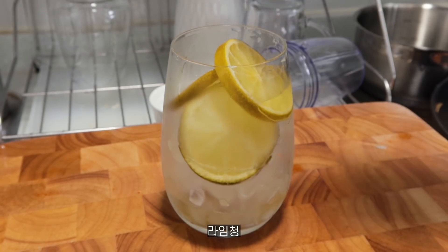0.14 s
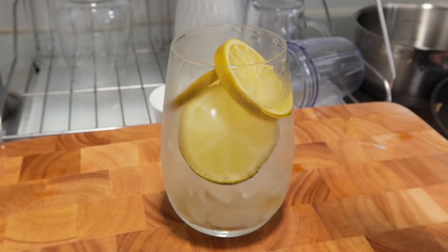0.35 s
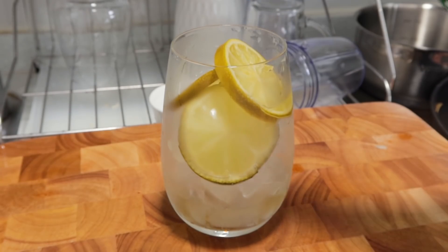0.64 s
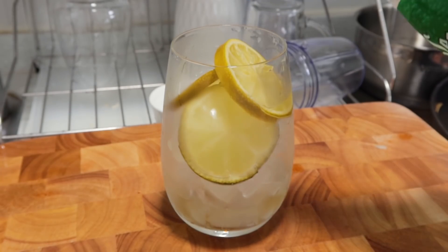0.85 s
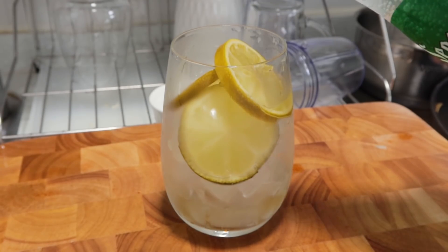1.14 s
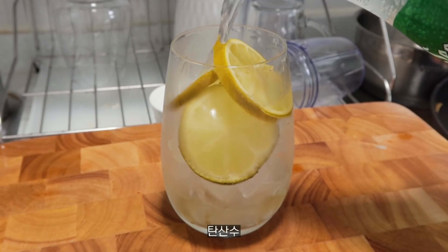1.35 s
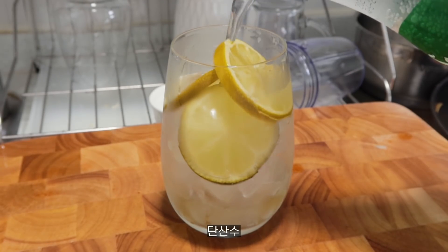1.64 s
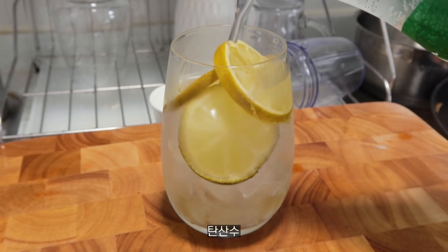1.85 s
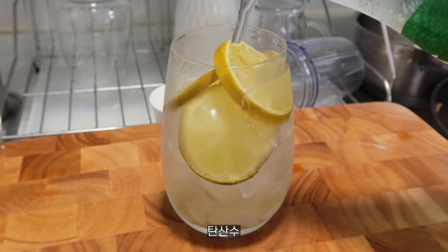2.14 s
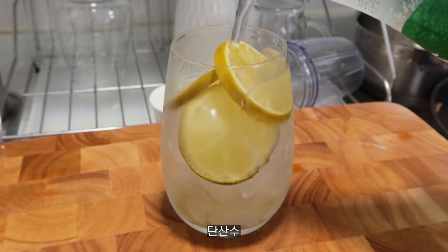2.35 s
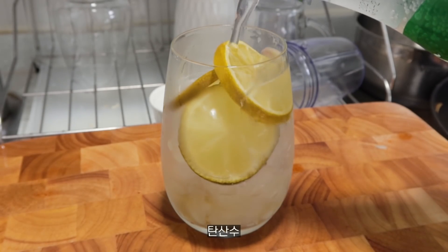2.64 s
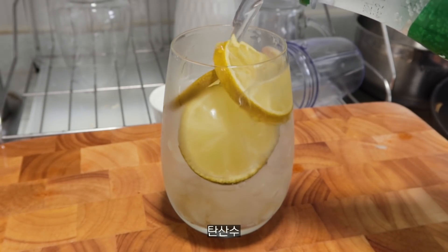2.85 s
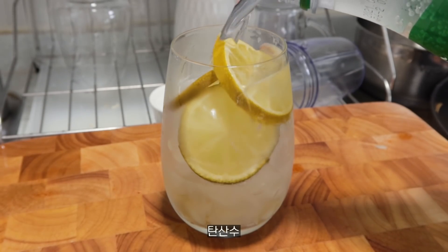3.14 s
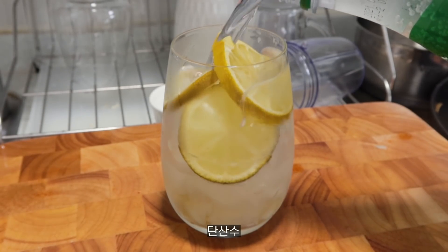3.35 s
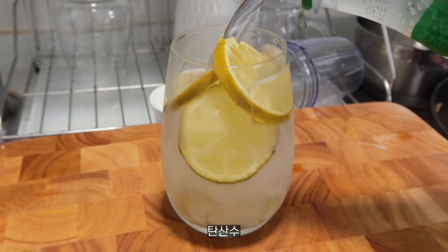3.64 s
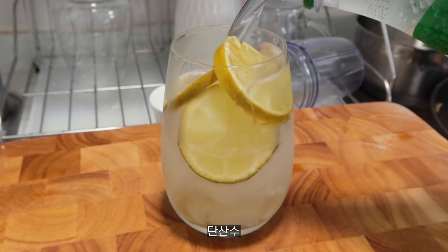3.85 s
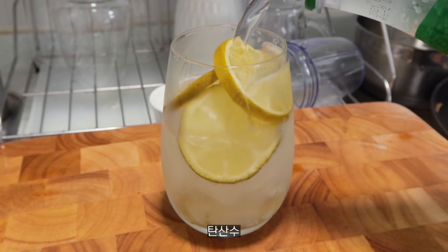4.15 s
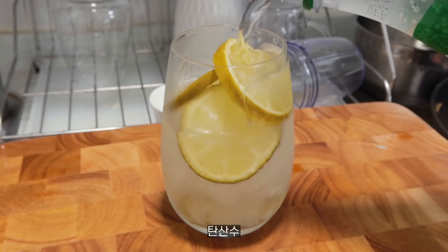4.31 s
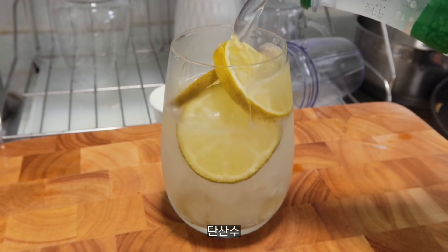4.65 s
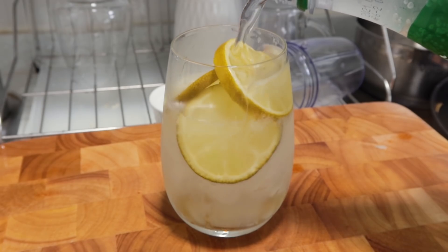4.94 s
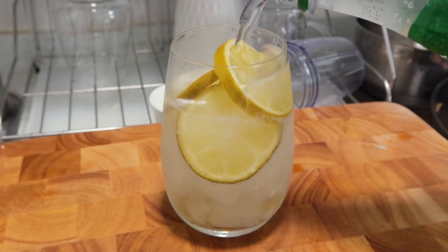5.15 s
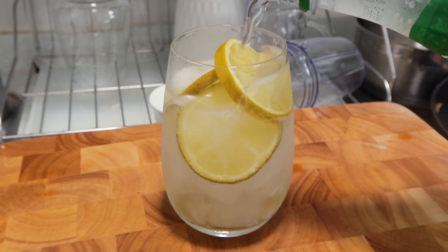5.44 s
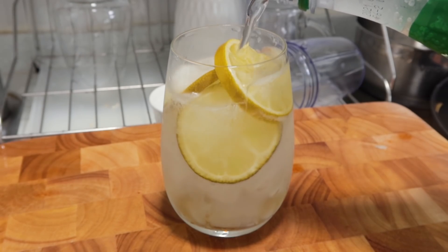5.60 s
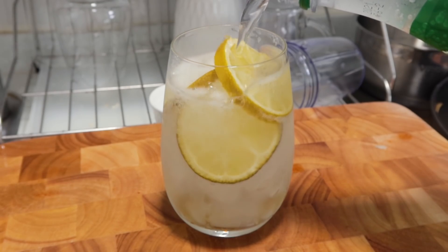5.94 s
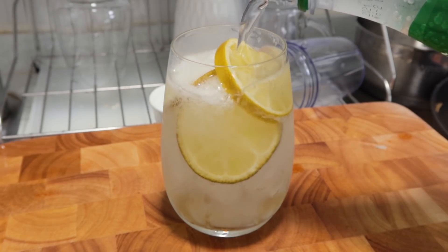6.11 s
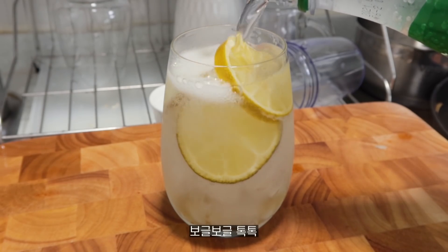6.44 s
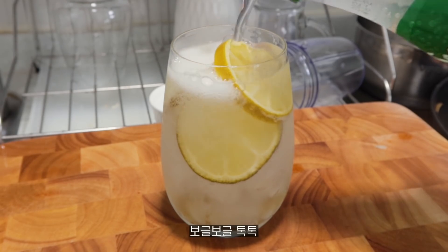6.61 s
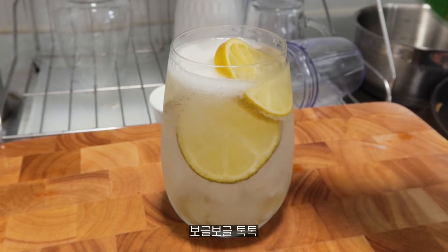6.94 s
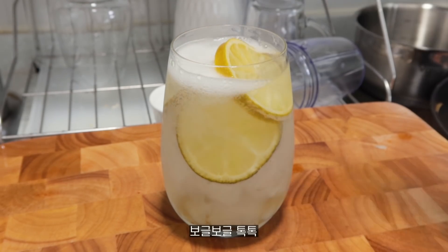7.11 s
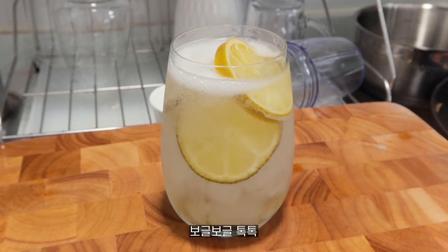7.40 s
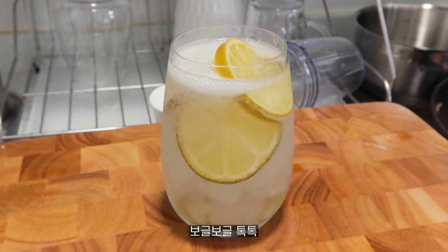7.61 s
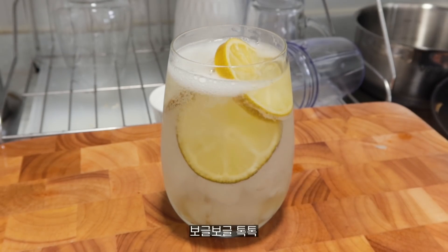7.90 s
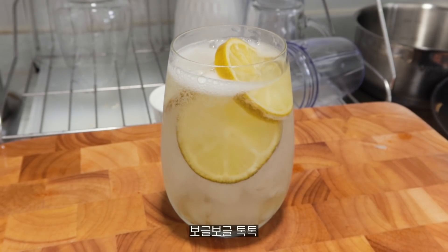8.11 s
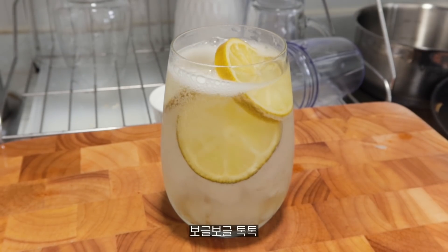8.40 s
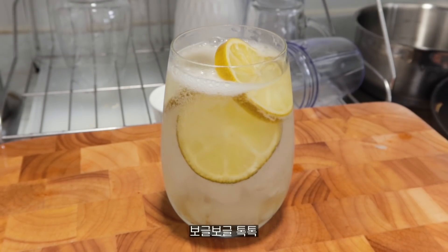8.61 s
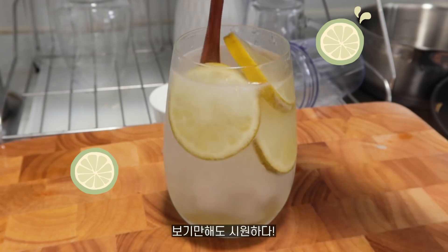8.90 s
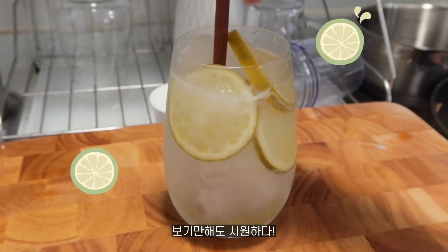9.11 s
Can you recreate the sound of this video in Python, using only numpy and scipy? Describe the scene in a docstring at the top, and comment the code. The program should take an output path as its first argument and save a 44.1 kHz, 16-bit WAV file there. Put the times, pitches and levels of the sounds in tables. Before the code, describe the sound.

In a quiet, faintly humming kitchen, close to a tall glass, ice ticks and small bubbles ping as soda is poured. Fine fizz grows into a broad, bright hiss while the glass's hollow note mostly climbs. After a long steady fizz, it cuts off suddenly; a loud rising plop and quick wet slaps and splashes end it.

```python
"""Soda fizzes over ice and lemon in a tall glass, close up in a humming kitchen.
The fizz is a swarm of tiny ringing bubbles and hiss, coloured by the air in the glass; foam broadens it.
The note of the air column mostly climbs as the glass fills; ice ticks and single bubbles pop.
At the end a heavy drop plops, a gliding tone, and noise bursts and bubbles make the slosh and splashes."""
import sys
import numpy as np
from scipy import signal
from scipy.fft import rfft, irfft, next_fast_len
from scipy.io import wavfile
from scipy.ndimage import uniform_filter1d, map_coordinates

SR = 44100
rng = np.random.default_rng(int(sys.argv[2]) if len(sys.argv) > 2 else 0)


def file_out(sig):
    """Save sig as 16-bit WAV at sys.argv[1]."""
    # one column per channel
    cols = np.atleast_2d(sig).T
    # limit, then scale
    lim = np.clip(cols, -1, 1)
    pcm = np.round(lim * 32767).astype(np.int16)
    wavfile.write(sys.argv[1], SR, pcm)


N = 408366  # length of the scene [samples]

# In every table, levels are relative to the other parts of the same sound unless a comment says more.
# T60 is the time a sound takes to fade by 60 dB.

# room noise: (frequency [Hz], level per Hz [dB])
KITCHEN_COLOUR = [(12, -46), (20, -21), (44, -6.5), (167, -8), (214, -10), (246, -5), (344, -12.5),
                  (418, -11), (1140, -17), (1280, -17.5), (2630, -23), (3030, -20.5), (4480, -23),
                  (8500, -23.5), (15700, -25)]
# hum of appliances: (pitch [Hz], average level [dB])
HUM_TONES = [(52, -67.5), (102, -69), (242, -66), (9400, -81)]
# echoes from the board and walls: (delay [s], level [dB])
WALL_ECHOES = [(0.00252, -17.5), (0.00481, -17), (0.00526, -26), (0.00534, -18), (0.00543, -19),
               (0.00589, -21.5), (0.00641, -22), (0.00716, -21.5)]
# faint hollow notes before the pour: (middle [s], half length [s], pitch [Hz], level [dB])
HOLLOW_NOTES = [(.62, .17, 1085, -67), (0.658, .14, 2610, -70), (1.0, 0.31, 1960, -70)]
# tone of the ice ticks: (frequency [Hz], level per Hz [dB])
CRACKLE_COLOUR = [(900, -40), (2000, -6), (3300, -8), (4600, 2), (8700, 0), (15000, -6)]
# ice cracking and spatter: (time [s], level [dB], centre [Hz], T60 [s])
ICE_SNAPS = [(0.349, -56, 7000, 0.26), (0.599, -48, 4500, .04), (.888, -49, 6500, .027),
             (1.187, -43, 7800, .026), (1.347, -44, 9000, .023), (1.425, -48, 8500, 0.033),
             (1.493, -43.5, 13000, .04), (1.526, -48, 4500, .03), (1.553, -47, 6000, .025),
             (1.615, -47, 10000, .04), (1.701, -39, 12400, 0.056), (2.029, -47, 1720, 0.052),
             (2.452, -38, 2400, .018), (2.609, -31, 6870, 0.016), (3.23, -47, 14500, .06),
             (4.28, -36, 2000, 0.028)]
# pings of single bubbles: (time [s], level [dB], pitch [Hz])
BUBBLE_POPS = [(.632, -44, 5010), (.659, -39.5, 5720), (.706, -45, 8500), (.94, -46.5, 7700),
               (1.111, -44, 8500), (1.495, -35.5, 4370), (1.527, -43, 3920), (1.553, -42, 2530),
               (1.581, -44, 6600), (1.59, -27.5, 4230), (1.624, -40, 5300), (1.696, -37.5, 6370),
               (1.757, -41.5, 2590), (1.78, -42, 5700), (1.862, -43.5, 707), (2.029, -40, 1870),
               (2.078, -28.5, 2150), (2.111, -42, 4300), (2.134, -44, 4440), (2.258, -46.5, 2140),
               (2.305, -41, 4440), (2.354, -32.5, 722), (2.448, -38, 2850), (2.766, -31.5, 7000),
               (3.026, -31.5, 8100), (3.278, -36, 2170), (3.319, -42, 806), (3.349, -21, 6860),
               (3.507, -34, 4140), (3.81, -42, 950), (3.903, -34, 3940), (4.12, -35, 2270),
               (4.16, -36, 900), (4.2, -41, 1180)]
# the drop meets the surface: (pitch [Hz], level [dB], T60 [s])
IMPACT_TONES = [(556, -14, 0.033), (960, -7, 0.023), (2740, -5, 0.014), (3450, -5, 0.013),
                (5680, -1, 0.026), (7000, -7, 0.023), (8460, -8, .03)]
# resonances rung by the plop: (pitch [Hz], T60 [s], level [dB])
BASIN_TONES = [(940, 0.089, -23.5), (1430, 0.052, -29), (1770, 0.1, -24), (2430, 0.061, -20.5)]
# tone of moving liquid: (frequency [Hz], level per Hz [dB])
WATER_COLOUR = [(88, -54), (150, -35), (312, -17), (384, -8), (419, -10.5), (579, -3.5), (732, -12),
                (898, -6.5), (1550, -7.5), (1760, -10), (2860, -13.5), (5000, -22), (6500, -55),
                (11000, -120)]
# tone of flying spray: (frequency [Hz], level per Hz [dB])
SPRAY_COLOUR = [(1650, -6), (2800, -7.5), (4710, 0.5), (5640, 2.5), (6900, -1), (8880, 3), (15700, -8.5)]
# waves of sloshing liquid: (time [s], body level [dB], spray level [dB], T60 [s])
SLOSH_WAVES = [(8.731, -33, -57, 0.094), (8.794, -24, -28, 0.2), (8.83, -41, -38.5, 9),
               (8.992, -24, -35.5, 1.77), (9.042, -21, -23, 0.2)]
# slaps of liquid: (time [s], level [dB], bubble pitch [Hz], spray against the slap before a 4 dB cut [dB])
LIQUID_SLAPS = [(8.993, -15.5, 1400, -12), (9.007, -14, 890, -18), (9.043, -7.5, 2830, -6.5),
                (9.056, -23, 1040, -7), (9.069, -16, 520, -18), (9.075, -13, 1190, -19),
                (9.086, -14.5, 900, 0.5), (9.121, -8.5, 575, -17), (9.138, -15, 580, -13),
                (9.222, -11.5, 990, -13), (9.244, -8.5, 1600, -16), (9.247, -14, 574, -20)]
# cross modes of the air above the drink: (frequency before the climb [Hz], width [Hz], level [dB])
AIR_MODES = [(1795, 220, -2.5), (2310, 210, -5.5), (2670, 160, -3), (3780, 160, -0.5), (4240, 250, 3),
             (4900, 460, 1), (5930, 580, 0), (6520, 370, -3), (7700, 1300, -3), (8730, 430, 2.5),
             (10400, 1200, -9), (12970, 1400, -5.5), (14900, 1500, -12)]
# the same air, damped by foam: (frequency [Hz], level per Hz [dB])
FOAM_COLOUR = [(500, -20.5), (950, -12.5), (1350, -11), (1700, -1.5), (2290, 9.5), (3250, -2), (4350, 3.5),
               (5350, -2.5), (6250, 2), (7450, -5), (8750, 1.5), (9700, -9.5), (11800, -12), (13100, -8.5),
               (15700, -15)]
# how hard the drink gives off gas, which sets the fine fizz: (time [s], level [dB])
GAS_LEVEL = [(.3, -80), (.65, -68), (1.55, -65.5), (2.15, -65.5), (2.65, -55.5), (3.35, -47.5),
             (3.8, -49.3), (4.15, -43.5), (5.3, -41), (6.3, -42), (7.5, -40.5), (8.7, -41)]
# the air column shortens as the glass fills: (time [s], pitch [Hz])
COLUMN_PITCH = [(2.3, 700), (3.3, 821), (3.9, 983), (4.2, 1189), (5.0, 1672), (5.8, 1900), (7.5, 1738),
                (8.7, 1883)]
# the tone of the fizz drifts as the foam builds and settles, each column a change in level:
# (middle [s], half length [s], medium bubbles [dB], coarse bubbles [dB], air column [dB])
FIZZ_DRIFTS = [(3.05, .3, -2, -1, 2), (4.3, .2, 1, 1.5, 3), (4.9, .3, -2.5, .5, 4),
               (6.056, 0.36, 2, 1.3, -10.5), (7.15, .5, -2, -4.5, 7.5), (7.95, .25, -1, 1.5, 0),
               (8.554, .33, 3.7, -5.3, -3)]
# the stream surges and rings the glass: (middle [s], half length [s], pitch at the middle [Hz], level [dB])
STREAM_SURGES = [(2.62, .18, 4450, -56.5), (3.61, .16, 4300, -49.5), (4.65, .35, 4520, -49.5),
                 (6.3, .6, 2330, -48)]

TOP_HZ = 15780  # nothing is kept above this
DRONE_S, DRONE_HALF_S, DRONE_DB, DRONE_SWELL_DB = 4.2, 0.81, -69, 7  # middle, half length, level, swell

CRACKLE_FROM_S, CRACKLE_PEAK_S, CRACKLE_TO_S = .45, 1.3, 3.6  # the ice crazes as it is wetted
CRACKLE_DB, CRACKLE_SPREAD_DB, CRACKLE_T60_S = -54, 2.5, .025  # level before colouring
POP_T60_S, POP_REF_HZ, POP_DAMPING = 0.019, 4000, .4  # T60 at that pitch; higher pops die sooner by this power
TRICKLE_DB, TRICKLE_GROWS = -43, 0.53  # gain at full gas; dB of change for each dB of gas

# the drop's trapped bubble
PLOP_S, PLOP_HZ, PLOP_DB = 8.8147, 432, -9.3  # time, starting pitch, level
PLOP_OCTAVES_PER_S = 12.2  # it rises towards the surface
PLOP_ATTACK_S, PLOP_HOLD_S, PLOP_T60_S = 0.0015, 0.023, 0.093
TICK_S = 8.7962  # the drop touches the surface
WAVE_ATTACK_S = 0.0065

FIZZ_END_S, FIZZ_FADE_DB_PER_S = 8.76, 250
FOAM_HALF_S, FOAM_SPREAD_S = 4.92, 0.56  # the head of foam is half closed; how gradually it closes
MEDIUM_BARE_DB, MEDIUM_FOAM_DB = -8.5, -2  # medium bubbles against fine ones, on bare drink and under foam
COARSE_BARE_DB, COARSE_FOAM_DB = -9, -.5  # the same for coarse bubbles
COLUMN_DB, COLUMN_UNDER_FOAM_DB = -8, -1  # air column against coarse bubbles; change under full foam
SPUTTER_DB = .7  # extra unevenness of the fizz on bare drink
SING_WANDER_HZ, SING_FLICKER_DB = 70, 2.4
SING_FOLLOWS = .4  # share of the air column's climb that the ringing glass follows


def amp(db):
    """Turn decibels into gain."""
    return 10 ** (np.asarray(db) / 20)


def unit(x):
    """Scale to an average (rms) level of 1."""
    return x / np.sqrt(np.mean(x ** 2) + 1e-20)


def curves(rows):
    """Join table points into one value per sample for each column after the time."""
    s, *cols = np.transpose(rows)
    return [np.interp(np.arange(N) / SR, s, c) for c in cols]


def wobble(rate):
    """A smooth random curve with about this many random points a second."""
    knots = rng.standard_normal(int(N * rate / SR) + 4)
    coarse = np.arange(0, N + 64, 64)
    return np.interp(np.arange(N), coarse, map_coordinates(knots, [coarse * rate / SR]))


def swell(middle_s, half_s):
    """A smooth rise to 1 and fall around a moment."""
    return np.exp(-((np.arange(N) / SR - middle_s) / half_s) ** 2)


def filtered(x, response):
    """Multiply each frequency of a sound by a response."""
    m = next_fast_len(len(x) + 8192, True)
    return irfft(rfft(x, m) * response(np.fft.rfftfreq(m, 1 / SR)), m)[:len(x)]


def colour(points):
    """Make a response that follows (frequency [Hz], level [dB]) points."""
    f, db = np.transpose(points)
    return lambda hz: amp(np.interp(np.log(hz + 1), np.log(f), db))


def levelled(x):
    """Hold the rms near 1 over a fifth of a second, so that a curve can set the level."""
    power = np.abs(uniform_filter1d(x ** 2, SR // 5))
    return x / np.sqrt(power + np.mean(power) / 10 ** 3)


def add(track, s, sound):
    """Mix a sound into the track at a time in seconds."""
    part = track[round(s * SR):][:len(sound)]
    part += sound[:len(part)]


def ring(t, hz, t60, rise=0):
    """A damped resonance; a bubble's pitch rises as it nears the surface."""
    return np.sin(2 * np.pi * hz * t * (1 + rise * t / t60 / 2)) * np.exp(-np.log(1000) * t / t60)


def bubbles(times, low_hz, high_hz, cycles, spread_db, size):
    """A swarm of small ringing bubbles of random pitch and ring time, and strength if spread is set."""
    u = rng.random((len(times), 3))
    hz = np.minimum(low_hz * (high_hz / low_hz) ** u[:, :1], SR / 2)
    life = cycles * (.5 + u[:, 1:2]) / hz
    strength = amp(-spread_db * np.log(u[:, 2:] + np.exp(-4)))
    grains = strength * ring(np.arange(size) / SR, hz, life, rise=0.21)
    at = (times * SR).astype(int)[:, None] + np.arange(size)
    return np.bincount(at.ravel(), grains.ravel(), N)[:N]


def hollow(hz, width_hz):
    """Noise of rms about 1 in a narrow band around a steady or moving pitch."""
    band = unit(filtered(rng.standard_normal(N), lambda f: 1 / (1 + (f / width_hz) ** 2)))
    return band * np.sqrt(2) * np.sin(2 * np.pi * np.cumsum(hz * np.ones(N)) / SR)


def kitchen():
    """Room noise, the unsteady hum of appliances, and a low drone that swells during the pour."""
    air = amp(-56.0) * unit(filtered(rng.standard_normal(N), colour(KITCHEN_COLOUR)))
    hum = 0
    for hz, db in HUM_TONES:
        level = amp(db + 0.75 * wobble(7.8))
        phase = 2 * np.pi * np.cumsum(hz + 3 * wobble(14)) / SR
        hum = hum + level * np.sqrt(2) * np.sin(phase)
    drone_db = DRONE_DB + DRONE_SWELL_DB * swell(DRONE_S, DRONE_HALF_S)
    return air + hum + amp(drone_db) * hollow(372, width_hz=10.7)


def room(x):
    """Board and walls return a few early echoes and a short tail."""
    t = np.arange(SR // 4) / SR
    echo = rng.standard_normal(len(t)) * amp(-60 * t / 0.18) * (t > .008)
    echo *= amp(-11.0) / np.linalg.norm(echo)
    echo[0] = 1  # the direct sound
    for delay, db in WALL_ECHOES:
        echo[round(delay * SR)] += amp(db)
    return signal.fftconvolve(x, echo)[:N]


def murmur():
    """Faint hollow notes, narrow bands of noise, come and go as the bottle is brought over the glass."""
    return sum(amp(db) * swell(s, half_s) * hollow(hz, width_hz=78) for s, half_s, hz, db in HOLLOW_NOTES)


def crackle():
    """Wetted ice gives off a scatter of tiny dry ticks, each a short fading burst of noise."""
    out, t = np.zeros(N), np.arange(SR // 25) / SR
    times = rng.triangular(CRACKLE_FROM_S, CRACKLE_PEAK_S, CRACKLE_TO_S, size=48)
    for s in times:
        tick_db = CRACKLE_DB + CRACKLE_SPREAD_DB * rng.standard_normal()
        add(out, s, amp(tick_db - 60 * t / CRACKLE_T60_S) * rng.standard_normal(len(t)))
    return filtered(out, colour(CRACKLE_COLOUR))


def pops():
    """Single bubbles ping and leave a rattle of echoes in the glass; ice snaps are bursts of noise."""
    out, t = np.zeros(N), np.arange(SR // 6) / SR

    def burst(hz, share):
        """Noise around a pitch; share is the width as a part of that pitch."""
        noise = rng.standard_normal(len(t))
        return unit(filtered(noise, lambda f: 1 / (1 + ((f - hz) / (share * hz)) ** 2)))

    for s, db, hz in BUBBLE_POPS:
        t60 = POP_T60_S * (POP_REF_HZ / hz) ** POP_DAMPING
        ping = ring(t, hz, t60, rise=0.04) * (1 - np.exp(-t * hz / 0.72))
        crack = burst(hz, share=1.0) * amp(-24 - 60 * t / 0.013)
        rattle = burst(hz, share=0.13) * amp(-12 - 60 * t / 0.067)
        add(out, s, amp(db) * (ping + crack + rattle))
    for s, db, hz, t60 in ICE_SNAPS:
        add(out, s, burst(hz, share=0.31) * amp(db - 60 * t / t60) * (1 - np.exp(-t / 0.00031)))
    return out


def plop():
    """A drop ticks on the surface; its crater closes on a big bubble that glides upward."""
    out, t = np.zeros(N), np.arange(SR // 5) / SR
    phase = 2 * np.pi * np.cumsum(PLOP_HZ * 2 ** (PLOP_OCTAVES_PER_S * t)) / SR
    fade_db = -60 * np.maximum(t - PLOP_HOLD_S, 0) / PLOP_T60_S
    # a flickering tone at three times the pitch
    overtone_gain = amp(-14.5 + 0.54 * fade_db + 4.1 * wobble(130)[:len(t)])
    overtone = overtone_gain * np.sin(3 * phase + .5 * wobble(180)[:len(t)])
    gurgle = amp(-22) * unit(filtered(rng.standard_normal(len(t)), colour(WATER_COLOUR)))
    envelope = amp(PLOP_DB + fade_db) * np.minimum(t / PLOP_ATTACK_S, 1)
    add(out, PLOP_S, envelope * (np.sin(phase) + overtone + gurgle))
    tick = sum(amp(level) * ring(t, f, t60) for f, level, t60 in IMPACT_TONES)
    crack = rng.standard_normal(len(t)) * amp(-60 * t / 0.01)
    add(out, TICK_S, amp(-16.5) * tick + amp(-18.0) * crack)
    add(out, PLOP_S, sum(amp(level) * ring(t, f, t60) for f, t60, level in BASIN_TONES))
    add(out, PLOP_S, rng.standard_normal(len(t)) * amp(-27 - 60 * t / .008))
    # the collapsing crater knocks and pushes the air
    add(out, PLOP_S, amp(-21) * ring(t, 310, 0.029) + amp(-22) * ring(t, 72, 0.065))
    add(out, 8.835, amp(-31) * signal.windows.tukey(SR // 10, .3))
    return out


def sloshing():
    """Gains of the liquid's body and of its spray: each wave rises quickly and ebbs."""
    body = spray = 0
    for s, body_db, spray_db, t60 in SLOSH_WAVES:
        age = np.maximum(np.arange(N) / SR - s, 0)
        wave = (1 - np.exp(-age / WAVE_ATTACK_S)) * amp(-60 * age / t60)
        body = body + (amp(body_db) * wave) ** 2
        spray = spray + (amp(spray_db) * wave) ** 2
    return np.sqrt(body), np.sqrt(spray)


def splash():
    """Liquid slaps and folds over, trapping ringing bubbles and throwing spray."""
    body_gain, spray_gain = sloshing()
    start = SLOSH_WAVES[0][0]
    times = rng.uniform(start, N / SR, size=1100)
    swarm = bubbles(times, low_hz=340, high_hz=4970, cycles=9.7, spread_db=0.0, size=900)
    swarm = levelled(filtered(swarm, lambda hz: np.minimum(hz, 4000) + 200))
    churn = .5 * rng.standard_normal(N) * (np.arange(N) > start * SR)
    body = levelled(filtered(swarm + churn, colour(WATER_COLOUR)))
    drop_times = rng.uniform(start, N / SR, size=2500)
    droplets = bubbles(drop_times, low_hz=3100, high_hz=15100, cycles=1.3, spread_db=2, size=60)
    out = body_gain * body + spray_gain * levelled(filtered(droplets, colour(SPRAY_COLOUR)))
    t = np.arange(SR // 10) / SR
    for s, db, hz, mist_db in LIQUID_SLAPS:
        smack = unit(filtered(rng.standard_normal(len(t)), colour(WATER_COLOUR)))
        smack = smack * amp(-7.5 - 60 * t / 0.036)
        mist = unit(filtered(rng.standard_normal(len(t)), colour(SPRAY_COLOUR)))
        mist = mist * amp(mist_db - 4.0 - 60 * t / 0.02) * (1 - np.exp(-t / 0.00054))
        push = amp(-29) * ring(t, 102.3, 0.31)
        bubble = amp(-5.5) * ring(t, hz, 22 / hz, rise=0.11)
        add(out, s, amp(db) * (smack + mist + push + bubble))
    return out


def pour():
    """The state of the glass: gas [dB], pitch of the air column [Hz], and foam cover from 0 to 1."""
    foam = .5 + .5 * np.tanh((np.arange(N) / SR - FOAM_HALF_S) / FOAM_SPREAD_S / 2)
    return curves(GAS_LEVEL)[0], curves(COLUMN_PITCH)[0], foam


def headspace(x, column_hz, foam):
    """The air modes move with the column, and give way to broad humps as foam covers the drink."""
    hz, t, z = signal.stft(x, SR, nperseg=512)
    frames = np.minimum((t * SR).astype(int), N - 1)
    power = 0
    for cross_hz, width, db in AIR_MODES:
        detune = (hz[:, None] - np.hypot(cross_hz, column_hz[frames])) / width
        power = power + amp(db) ** 2 / (1 + detune ** 2) ** 2
    cover = foam[frames]
    gain = np.sqrt((1 - cover) * power + cover * colour(FOAM_COLOUR)(hz)[:, None] ** 2)
    return signal.istft(z * gain, SR, nperseg=512)[1][:N]


def trickle():
    """Mostly while the ice is still bare, the stream sheds stray pings that ring on in the air of the glass."""
    gas_db, column_hz, foam = pour()
    level_db = TRICKLE_DB + TRICKLE_GROWS * (gas_db - gas_db.max())
    times = rng.triangular(.5, 3.2, 5.2, size=300)
    pings = bubbles(times, low_hz=1880, high_hz=10100, cycles=34, spread_db=3.0, size=900)
    t = np.arange(SR // 16) / SR
    rebounds = rng.standard_normal(len(t)) * amp(-60 * t / 0.06)
    rebounds *= amp(-5.0) / np.linalg.norm(rebounds)
    rebounds[0] = 1  # the direct sound
    return amp(level_db) * headspace(signal.fftconvolve(pings, rebounds)[:N], column_hz, foam)


def fizz():
    """Bursting bubbles ring the air in the glass; foam multiplies them into a hiss."""
    fine_db, column_hz, foam = pour()
    # bigger bubbles gain as the foam builds
    medium_db = fine_db + (1 - foam) * MEDIUM_BARE_DB + foam * MEDIUM_FOAM_DB
    coarse_db = fine_db + (1 - foam) * COARSE_BARE_DB + foam * COARSE_FOAM_DB
    column_db = COLUMN_DB + foam * COLUMN_UNDER_FOAM_DB
    for s, half_s, medium_change_db, coarse_change_db, column_change_db in FIZZ_DRIFTS:
        drift = swell(s, half_s)
        medium_db = medium_db + medium_change_db * drift
        coarse_db = coarse_db + coarse_change_db * drift
        column_db = column_db + column_change_db * drift
    # more gas crowds the bubbles closer together
    chance = np.cumsum(amp(.7 * fine_db))
    times = np.interp(rng.random(14000), chance / chance[-1], np.arange(N) / SR)
    swarm = bubbles(times, low_hz=1206, high_hz=14800, cycles=6.6, spread_db=0.5, size=160)
    swarm = levelled(filtered(swarm, lambda hz: np.minimum(hz, 12000) + 500))
    hiss = (1.04 + 1.3 * foam) * rng.standard_normal(N)
    voice = headspace(swarm + hiss, column_hz, foam)

    def above(f, edge_hz):
        """Let through what lies above an edge."""
        return 1 - 1 / (1 + (f / edge_hz) ** 10)

    # each size of bubble has its own part of the spectrum
    coarse = levelled(filtered(voice, lambda f: 1 - above(f, 3170)))
    medium = levelled(filtered(voice, lambda f: above(f, 3070) - above(f, 5610)))
    fine = levelled(filtered(voice, lambda f: above(f, 5460)))
    uneven_db = 0.2 + SPUTTER_DB * (1 - foam)
    sound = 0
    for db, band in [(coarse_db, coarse), (medium_db, medium), (fine_db, fine)]:
        sound = sound + amp(db + uneven_db * wobble(14)) * band

    # the air column is a narrow resonance that follows the filling glass and broadens under foam
    narrow = np.sqrt(1 - foam ** 4) * hollow(column_hz, width_hz=85)
    broad = foam ** 2 * hollow(column_hz, width_hz=370)
    column = (narrow + broad) * amp(coarse_db + column_db + (1 - foam) * 1.6 * wobble(14))

    # the glass rings in the surges
    sing = 0
    for s, half_s, hz, db in STREAM_SURGES:
        climb = SING_FOLLOWS * (column_hz - column_hz[round(s * SR)])
        pitch = hz + climb + SING_WANDER_HZ * wobble(15)
        sing = sing + amp(db) * swell(s, half_s) * hollow(pitch, width_hz=180)
    sing = sing * amp(SING_FLICKER_DB * wobble(30))
    fade_db = -FIZZ_FADE_DB_PER_S * np.maximum(np.arange(N) / SR - FIZZ_END_S, 0)
    return (sound + sing + column) * amp(fade_db)


def scene():
    """One microphone feeds both channels; the plop, splash and kitchen get no added echoes."""
    in_room = room(murmur() + crackle() + pops() + trickle() + fizz())
    mono = kitchen() + plop() + splash() + in_room
    return np.array([mono, mono])


def record(dry):
    """The recorder keeps nothing above its band limit."""
    return np.array([filtered(channel, lambda hz: hz < TOP_HZ) for channel in dry])


dry = scene()
out = record(dry)
file_out(out)
```